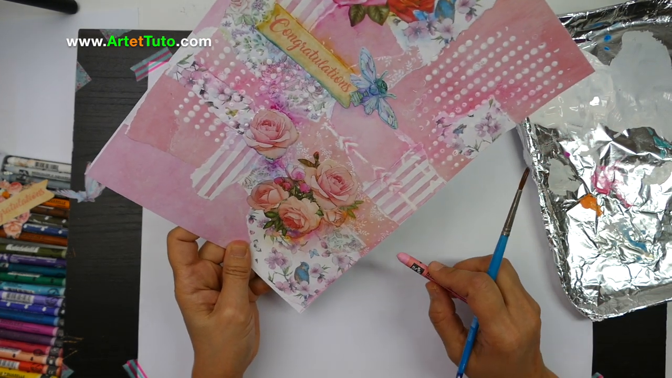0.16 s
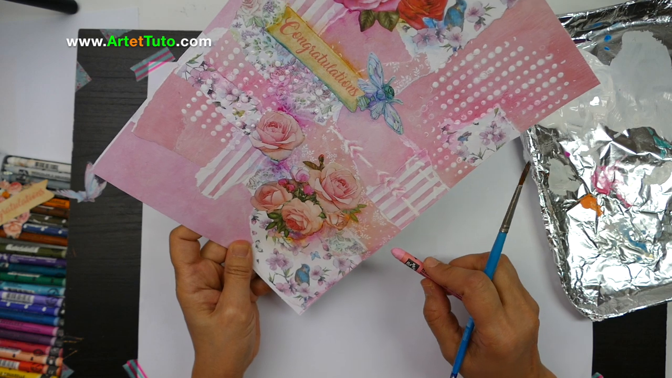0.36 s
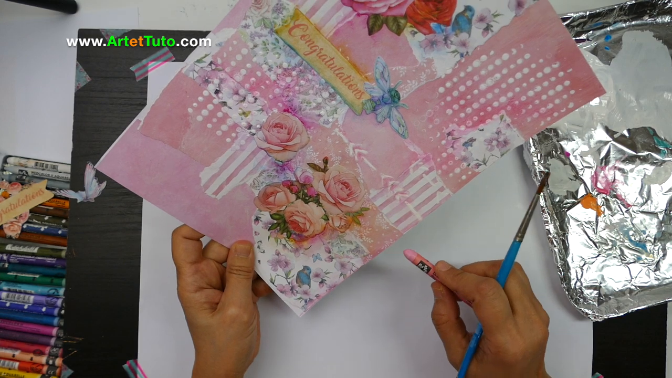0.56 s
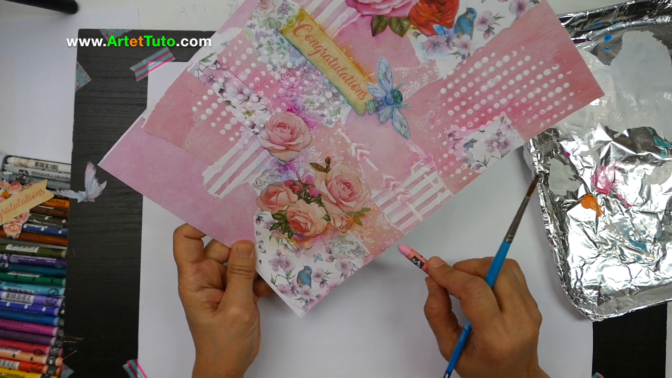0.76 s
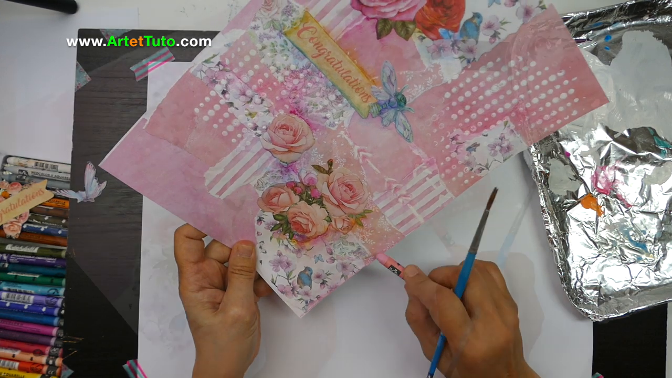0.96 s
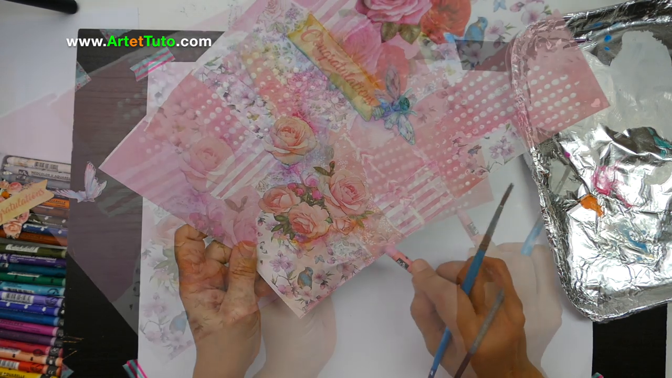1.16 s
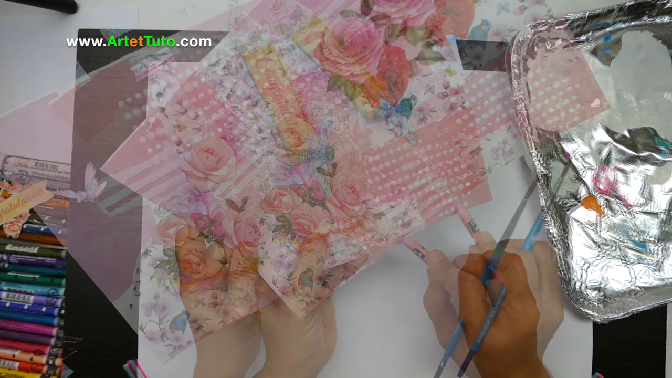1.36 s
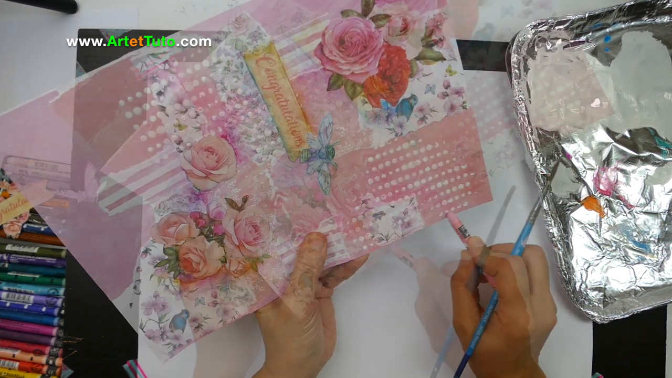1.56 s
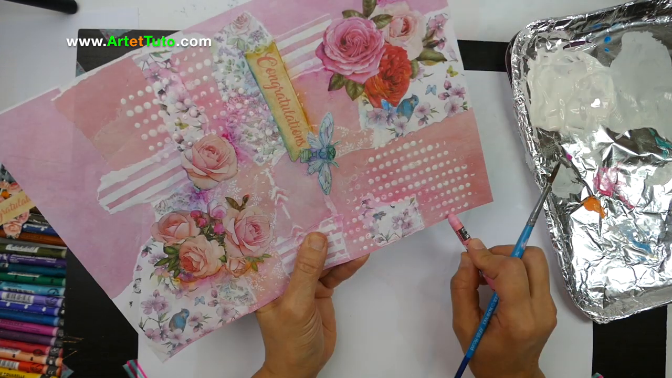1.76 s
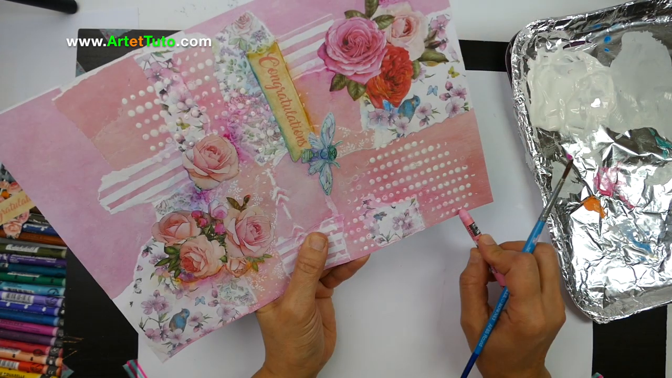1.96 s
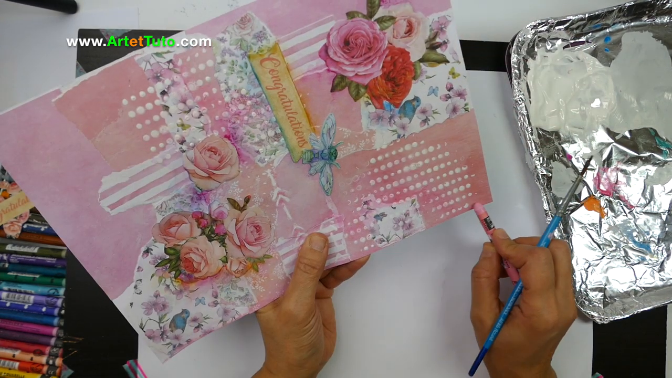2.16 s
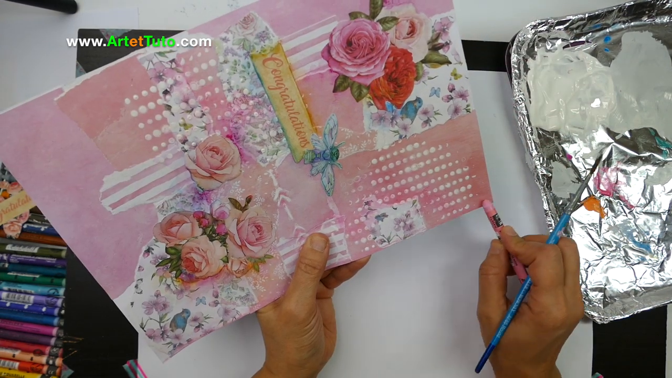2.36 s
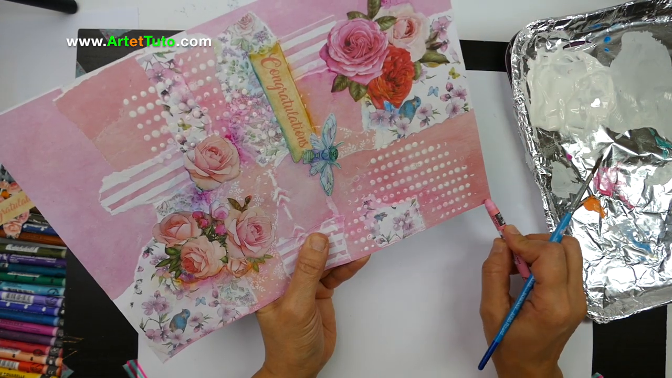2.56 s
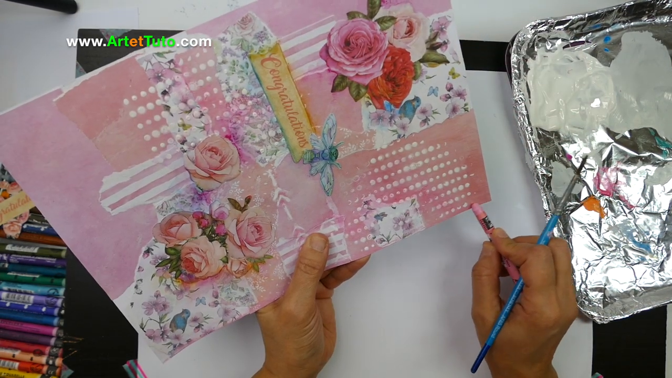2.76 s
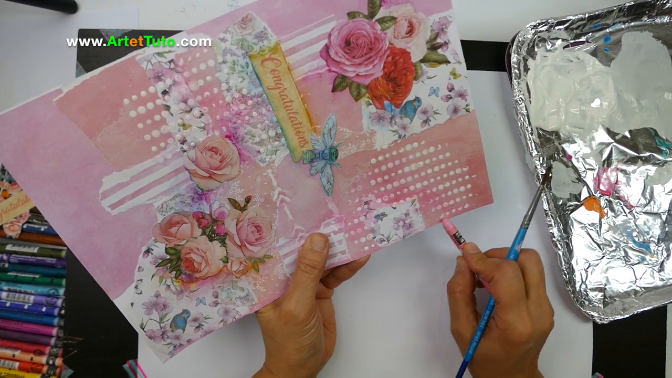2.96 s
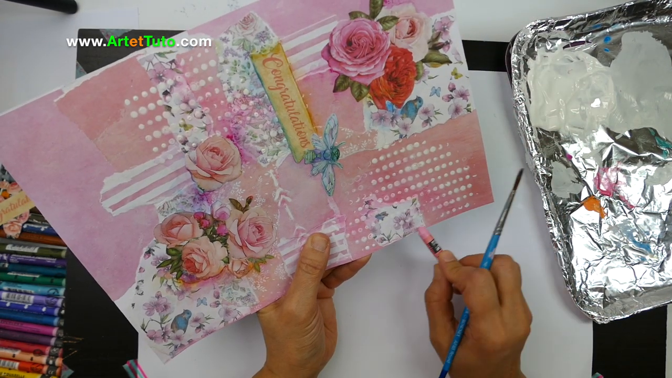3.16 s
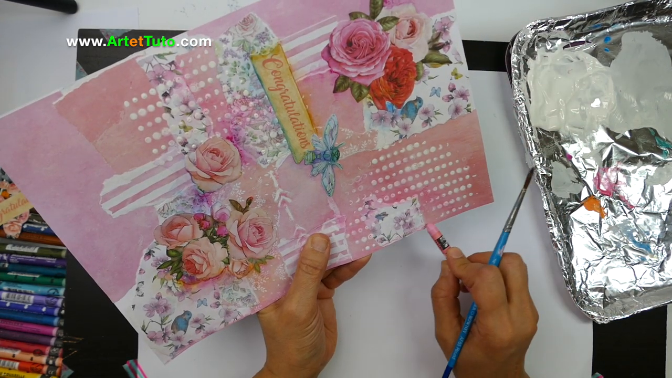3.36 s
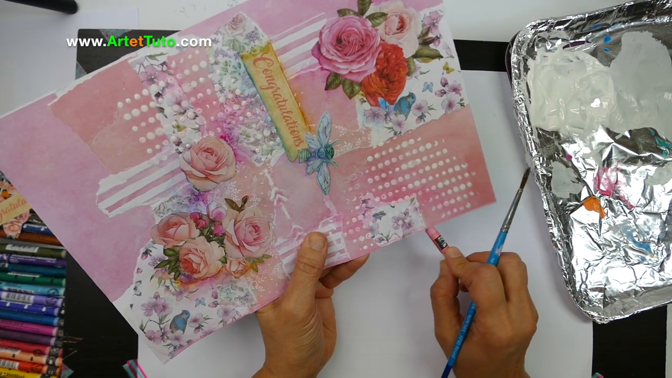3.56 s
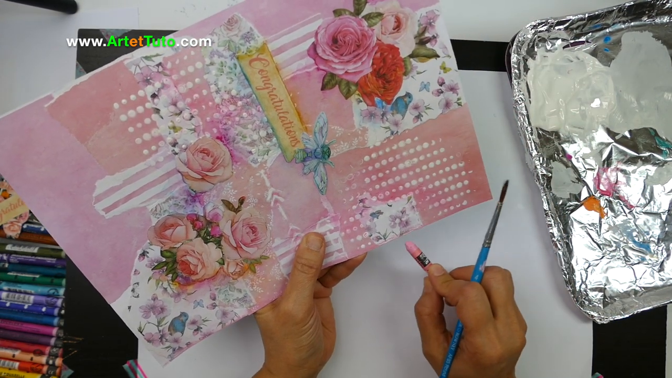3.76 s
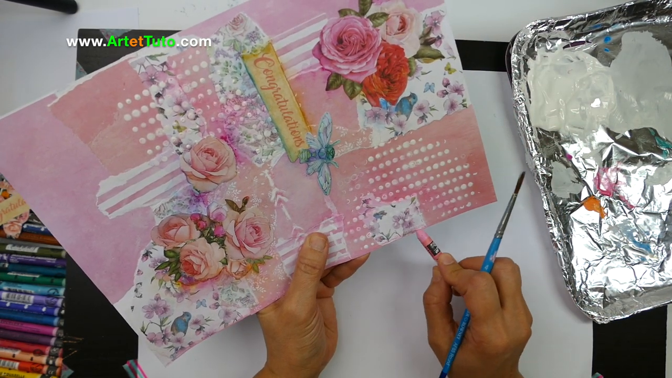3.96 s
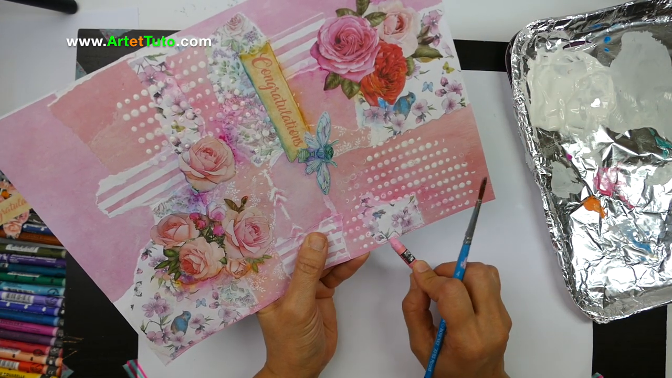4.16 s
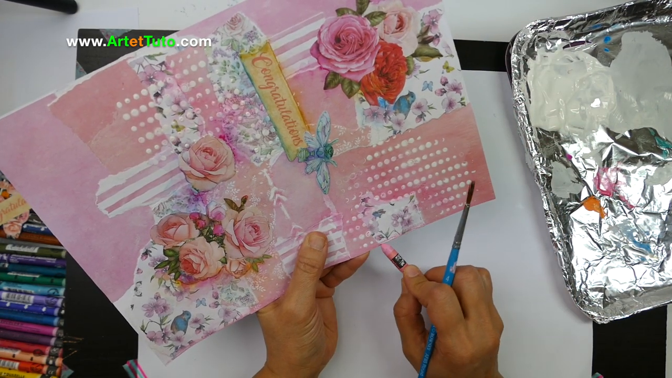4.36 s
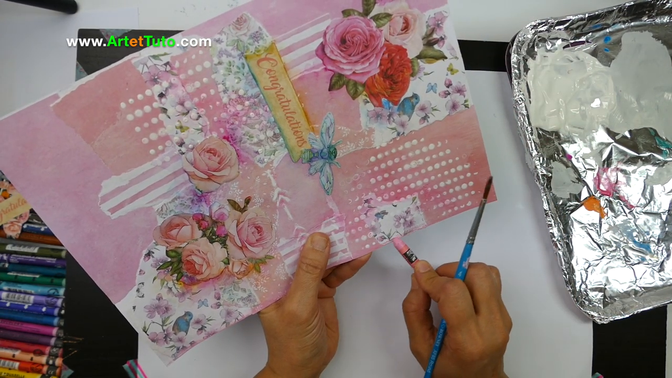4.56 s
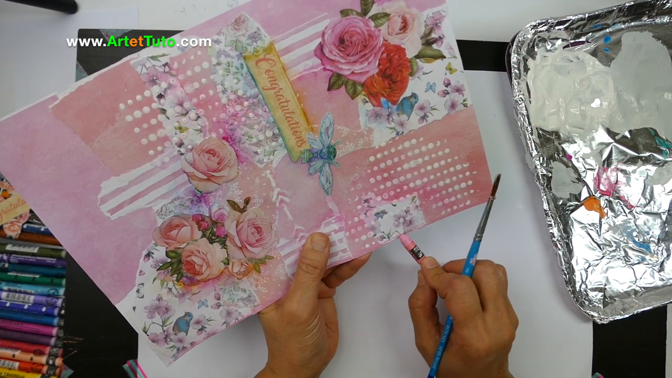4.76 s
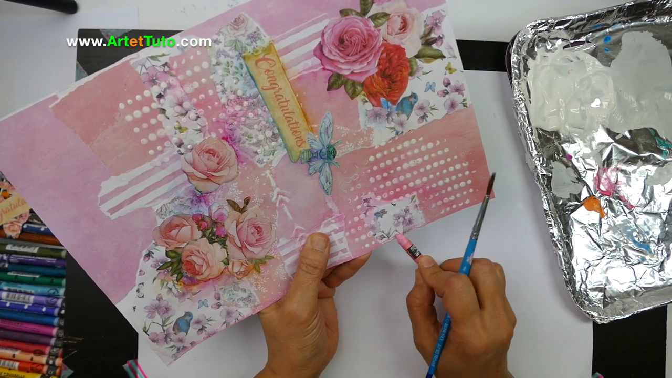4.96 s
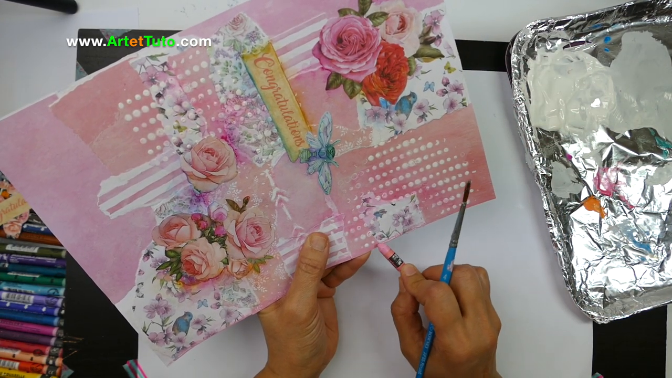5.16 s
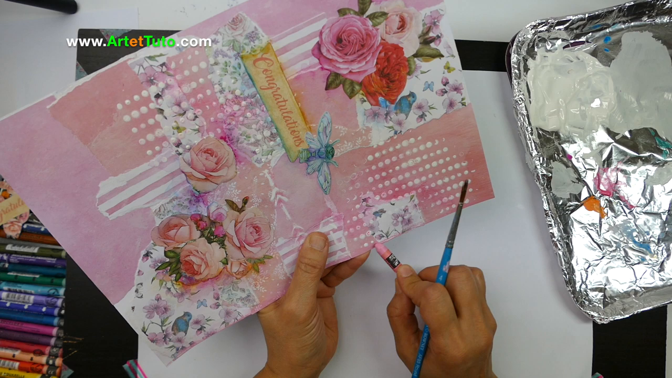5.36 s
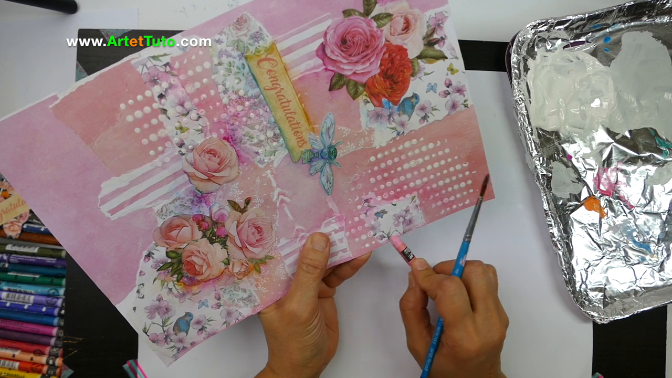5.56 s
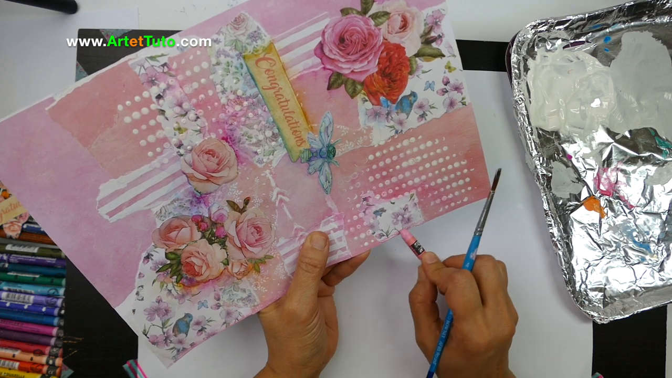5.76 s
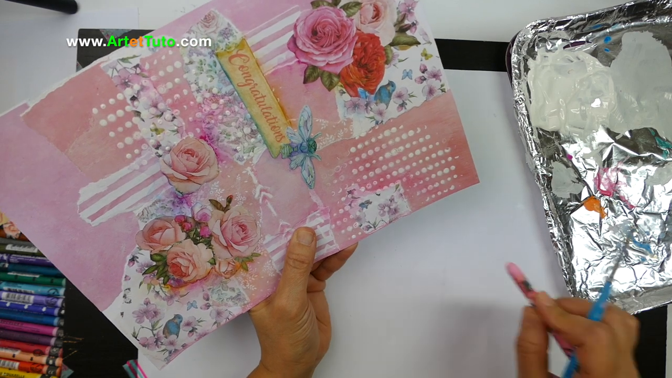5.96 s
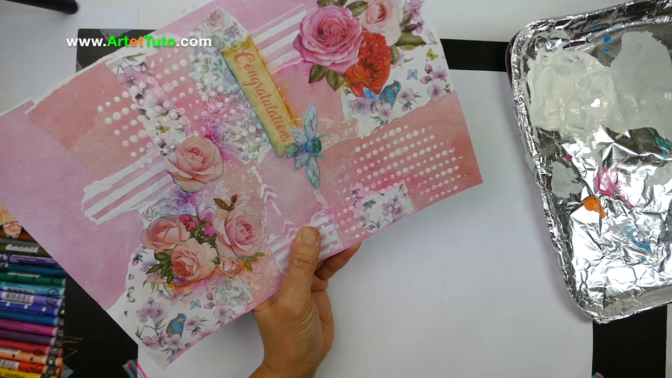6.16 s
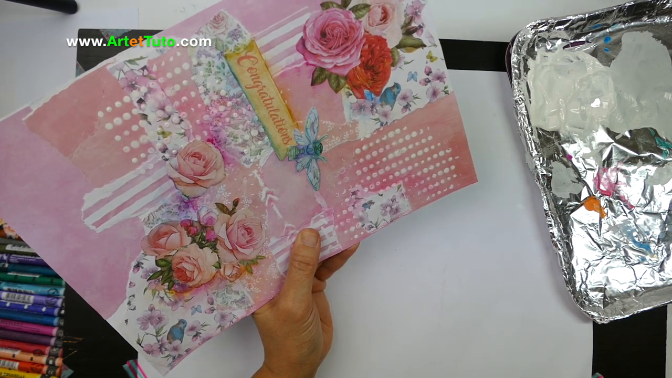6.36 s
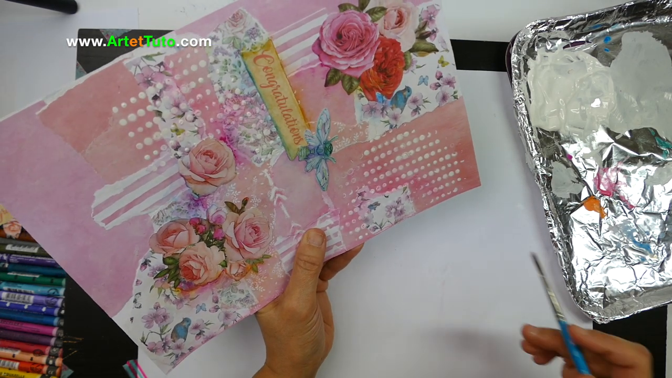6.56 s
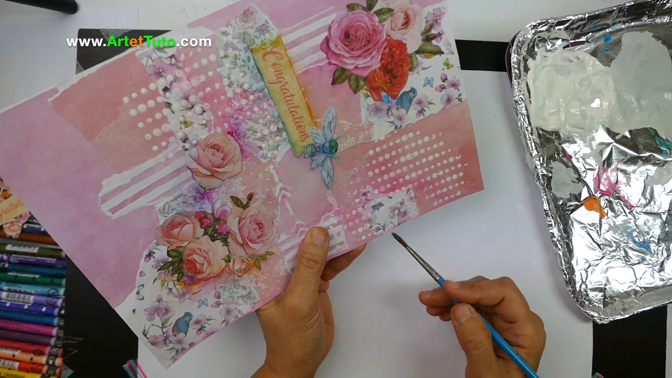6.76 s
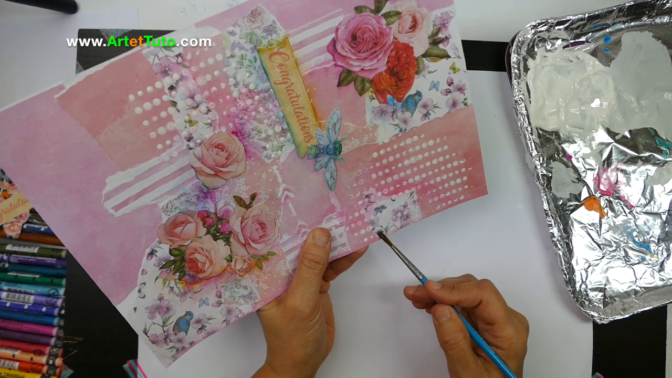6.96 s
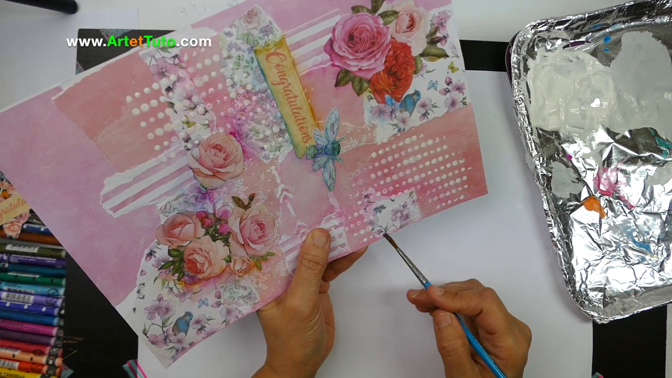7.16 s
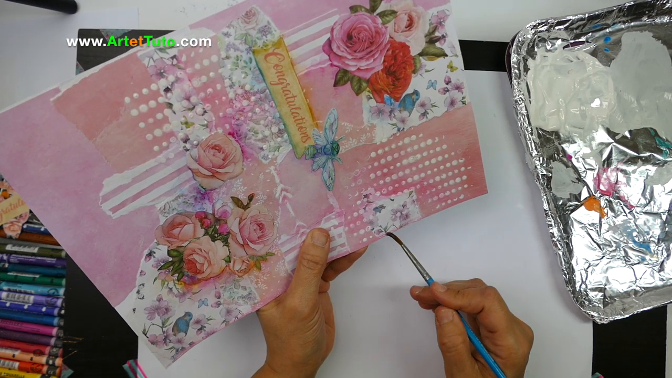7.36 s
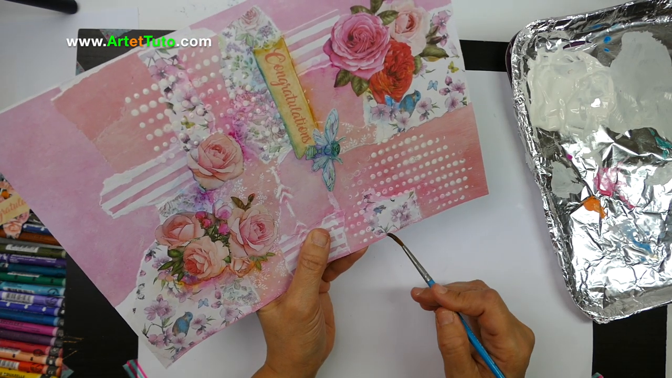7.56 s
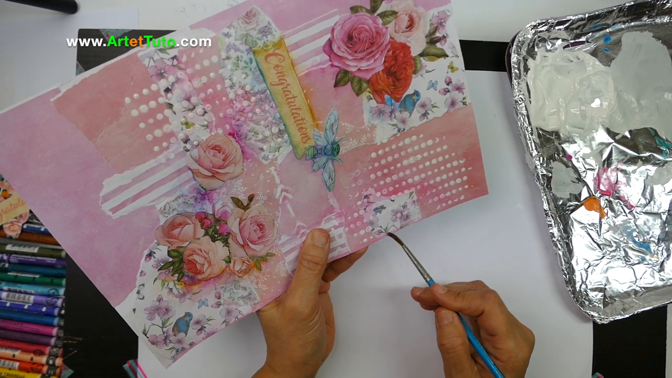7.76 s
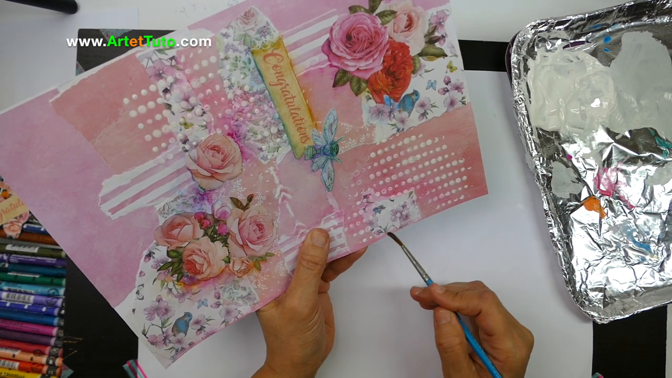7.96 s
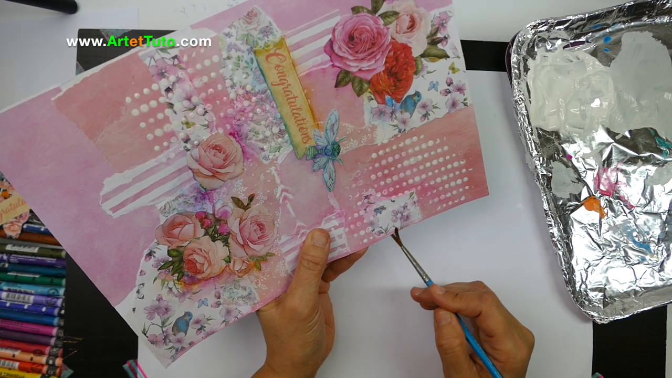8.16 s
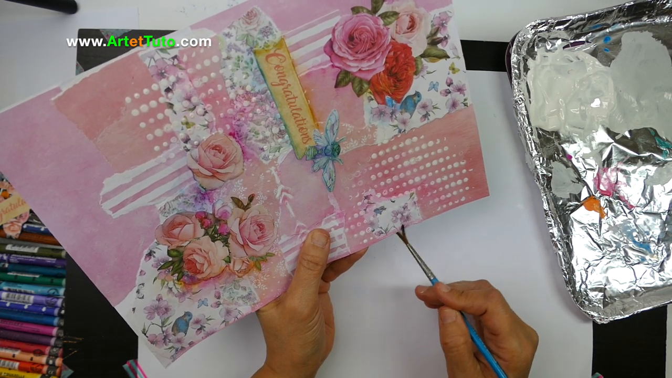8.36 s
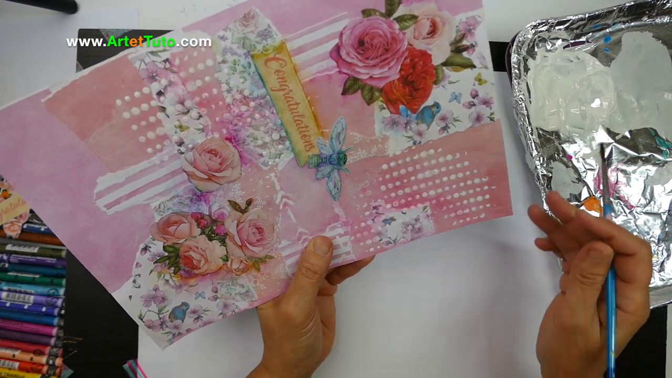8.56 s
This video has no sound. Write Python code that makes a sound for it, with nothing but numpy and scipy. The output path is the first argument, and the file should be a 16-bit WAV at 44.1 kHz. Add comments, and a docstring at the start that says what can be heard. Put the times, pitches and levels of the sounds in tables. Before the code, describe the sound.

Quick dry rubbing and small papery knocks on a stiff card, one sharp clatter on a desk, then very soft bristle strokes in a quiet room.

```python
"""Rubbing and brushing a card's edge

A pastel stick is rubbed to and fro, about eight strokes a second, along the edge of a hand-held paper card,
now and then knocking against it: random slips and single blows excite the card's modes and crumble pigment.
The stick is dropped on the desk and bounces with a clatter of decaying modes and noise; then a paintbrush
whisks softly over the same edge, as shaped random flicks. Small slides, clicks and bumps lie between.
The small, quiet room adds dense reflections, the whirr of a fan and a steady hiss."""
import sys
import numpy as np
from scipy import signal
from scipy.fft import rfft, irfft, next_fast_len
from scipy.io import wavfile

SR = 44100
rng = np.random.default_rng(int(sys.argv[2]) if len(sys.argv) > 2 else 0)


def file_out(sig):
    """Save sig as 16-bit WAV at sys.argv[1]."""
    # one column per channel
    cols = np.atleast_2d(sig).T
    # limit, then scale
    lim = np.clip(cols, -1, 1)
    pcm = np.round(lim * 32767).astype(np.int16)
    wavfile.write(sys.argv[1], SR, pcm)


N = 379701
T = np.arange(N) / SR   # time [s]

# the card's low bending modes: (frequency [Hz], width [Hz], level [dB])
BENDING_MODES = [(127, 53, -16.5), (190.6, 42, -2.5), (251, 51, -0.5), (326, 26, 1.5), (475, 112, -0.5)]
# the card's higher ringing modes: (frequency [Hz], width [Hz], level [dB])
RINGING_MODES = [(573, 40, -15), (694, 51, 3.5), (806, 84, 1.5), (893, 93, -1), (1042, 83, -1.5),
                 (1193, 106, -0.5), (1456, 98, -1), (1650, 153, -1), (1840, 790, -9.5)]
# pigment crumbling on the paper's tooth: (frequency [Hz], relative level per Hz [dB])
PIGMENT_SPECTRUM = [(1500, -17.5), (2300, -3.5), (3150, 4.5), (3650, -3), (4250, -1), (4700, -3.5),
                    (5250, -1), (6500, -7.5), (8400, -2.5), (10200, -9.5), (13500, -7.5), (16000, -14)]


def from_db(db):
    """A level in decibels is a logarithmic amplitude ratio."""
    return 10 ** (np.asarray(db) / 20)


def rms_one(x):
    """Root-mean-square normalisation gives unit mean power."""
    return x / np.sqrt(np.mean(x ** 2) + 1e-20)


def peak_one(x):
    """Peak normalisation gives a largest excursion of one."""
    return x / np.max(np.abs(x))


def at_hz(points, hz):
    """Linear interpolation of a table on a log-frequency axis."""
    table_hz, values = np.transpose(points)
    return np.interp(np.log(np.maximum(hz, 1)), np.log(table_hz), values)


def coloured(x, spectrum):
    """Spectral shaping: each frequency component is scaled by the table; the result has rms 1."""
    size = next_fast_len(len(x))
    gain = from_db(at_hz(spectrum, np.fft.rfftfreq(size, 1 / SR)))
    return rms_one(irfft(rfft(x, size) * gain, size)[:len(x)])


def cut(x, hz, kind="low", order=2):
    """Butterworth filtering: a maximally flat passband with a smooth roll-off."""
    sos = signal.butter(order, np.minimum(hz, SR / 2 - 1), kind, fs=SR, output="sos")
    return signal.sosfilt(sos, x)


def resonate(x, modes):
    """Modal superposition: parallel two-pole resonances of alternating sign."""
    out = 0
    for k, (hz, width, db) in enumerate(modes):
        r = np.exp(-np.pi * width / SR)   # a wider resonance decays faster
        poles = [1, -2 * r * np.cos(2 * np.pi * hz / SR), r * r]
        mode = signal.lfilter([1, 0, -1], poles, x + 1e-18)
        out = out + (-1) ** k * from_db(db) * (1 - r * r) / 2 * mode
    return out


def favour(hz, centre_hz, db_per_octave=8.5):
    """Selective excitation: modes far from the favoured pitch are driven less."""
    return from_db(-db_per_octave * np.abs(np.log2(hz / centre_hz)))


def add(track, s, sound):
    """Linear superposition: mix a short sound in at time s."""
    at = int(round(s * SR))
    track[at:at + len(sound)] += sound[:N - at]


def burst(t, rise_s, t60):
    """Contact transient: a brief build-up, then exponential decay by 60 dB in t60 seconds."""
    return (1 - np.exp(-(t / rise_s) ** 2)) * from_db(-60 * t / t60)


def swell(start, top, end, sharpness):
    """Friction level follows speed: near nil at the turning points, levelling off at top; arch of rms 1."""
    speed = np.sin(np.linspace(0, np.pi, 200)[:-1])
    arch = np.tanh(speed ** sharpness)
    phase = np.interp(np.arange(start, end, 1 / SR), [start, top, end], [0, .5, 1])
    return np.interp(phase, np.linspace(0, 1, len(arch)), rms_one(arch))


def strokes(start, end, number, return_db, pressure, push_longer=0.028):
    """Periodic reciprocation: push and return alternate; yields (start [s], end [s], level [dB])."""
    k = np.arange(number + 1)
    # the push takes this share more than its even share of time, the return less
    turns = start + (end - start) * (k + push_longer * (k % 2)) / number
    middles = (turns[:-1] + turns[1:]) / 2
    db = np.interp(middles, *np.transpose(pressure)) - return_db * (k[:-1] % 2)
    return zip(turns, turns[1:], db)


def grains(per_s, spread_db):
    """Stochastic impulses: tiny slips at random moments, of very uneven size and random sign."""
    sizes = from_db(spread_db * np.minimum(rng.exponential(1, N), 5))
    return (rng.random(N) < per_s / SR) * sizes * rng.choice([-1, 1], N)


def judder(rate_hz, depth_db):
    """Random amplitude modulation: the grip of a rubbing contact wavers."""
    wavering = rms_one(cut(rng.standard_normal(N), rate_hz))
    return rms_one(from_db(depth_db * wavering))


def drift(rate_hz):
    """Slow random modulation: straight lines join rate_hz random values a second, spread near 1."""
    knots = rng.standard_normal(int(N / SR * rate_hz) + 2)
    return np.interp(T * rate_hz, np.arange(len(knots)), knots)


def fan_whirr():
    """Resonant filtering: the fan's housing colours broadband noise."""
    # resonances of the housing: (frequency [Hz], width [Hz], level [dB])
    housing = [(604, 29, 2.5), (687, 17, 0)]
    # the whirr's course: (time [s], level [dB])
    course = [(0, -58), (1.3, -61), (6.1, -60), (6.6, -65.5), (8.6, -59)]
    whirr = rms_one(cut(resonate(rng.standard_normal(N), housing), [480, 820], "band"))
    return from_db(np.interp(T, *np.transpose(course))) * whirr


def steady_hiss(level_db=-57.5):
    """Stationary noise: fan and microphone hiss of fixed spectrum."""
    # (frequency [Hz], relative level per Hz [dB])
    hiss_spectrum = [(20, -17), (55, -4.5), (140, 0.5), (250, -1.5), (480, -5), (800, -4.5), (1400, -7),
                     (2600, -11), (3600, -17), (6000, -18), (9500, -18), (14500, -16), (16000, -17.5)]
    return from_db(level_db) * coloured(rng.standard_normal(N), hiss_spectrum)


def drones(width_hz=16, sharpness=0.76):
    """Narrow-band noise: random quadrature modulation makes a wavering tone, over a deep noise rumble."""
    # (start [s], end [s], frequency [Hz], drone level [dB], rumble level [dB])
    drone_spells = [(3.25, 4.4, 76.4, -69, -74), (6.802, 8.0, 113, -70.5, -90),
                    (8.1, 8.9, 99.6, -71.5, -72)]
    out = np.zeros(N)
    rumble = rms_one(cut(rng.standard_normal(N), [38, 85], "band"))
    for start, end, hz, drone_db, rumble_db in drone_spells:
        level, phase = np.zeros(N), 2 * np.pi * hz * T
        add(level, start, swell(start, (start + end) / 2, end, sharpness))
        drone = rms_one(drift(width_hz) * np.sin(phase) + drift(width_hz) * np.cos(phase))
        out += level * (from_db(drone_db) * drone + from_db(rumble_db) * rumble)
    return out


def reflections(x, build_up_s=0.0061, wall_hz=7000):
    """Diffuse reverberation: dense reflections build up, then decay at a rate set by frequency."""
    # reverberation time: (frequency [Hz], t60 [s])
    decay_times = [(150, 0.17), (500, 0.24), (1500, 0.17), (4000, 0.33), (14000, 0.296)]
    t, tail, edges = T[:SR // 2], 0, np.geomspace(100, 18000, 9)
    for low, high in zip(edges, edges[1:]):
        band = cut(rng.standard_normal(len(t)), [low, high], "band")
        tail = tail + band * from_db(-60 * t / at_hz(decay_times, np.sqrt(low * high)))
    tail = tail * (1 - np.exp(-(t / build_up_s) ** 2))
    tail = tail / np.sqrt(np.sum(tail ** 2))   # unit energy
    return signal.fftconvolve(x, cut(tail, wall_hz, order=1))[:N]


def bumps(rise_s=0.00422):
    """Single-mode excitation: a padded touch wakes only one low mode of the desk."""
    # soft, hollow bumps: (time [s], peak level [dB], frequency [Hz], t60 [s])
    soft_touches = [(6.172, -38, 308, 0.013), (6.839, -40.5, 413, 0.087)]
    out, t = np.zeros(N), T[:SR // 4]
    for s, db, hz, t60 in soft_touches:
        bump = np.sin(2 * np.pi * hz * t) * burst(t, rise_s, t60)
        add(out, s, from_db(db) * peak_one(bump))
    return out


def sliding(sharpness=1.4, attack_share=0.16):
    """Sliding friction: skin, stick and bristles on paper hiss softly, starting quickly and fading."""
    # brief slides: (start [s], length [s], level before the cut-off [dB], cut-off [Hz])
    brief_slides = [(.28, 0.22, -59, 3450), (0.467, 0.37, -65.5, 3000), (0.714, 0.35, -62.5, 3040),
                    (3.765, 0.044, -43.5, 3000), (5.591, .045, -58, 8900), (5.81, 0.13, -58, 2500),
                    (5.901, 0.15, -57.5, 12000), (6.164, 0.066, -59, 4000), (6.686, 0.11, -55, 8080)]
    # (frequency [Hz], relative level per Hz [dB])
    slide_spectrum = [(300, -13), (900, -4), (1450, 2), (2100, -4), (2800, -5.5), (4200, -8.5), (6000, -13),
                      (8200, -8.5), (11000, -14), (16000, -25)]
    out = np.zeros(N)
    hiss = coloured(grains(per_s=6900, spread_db=3.5), slide_spectrum)
    for start, length, db, top_hz in brief_slides:
        speed = swell(start, start + attack_share * length, start + length, sharpness)
        friction = speed * hiss[int(start * SR):][:len(speed)]
        add(out, start, from_db(db) * cut(friction, top_hz))
    return out


def clicks(low_hz=1300, crack_t60=0.0041, rattle=0.1):
    """Impact noise: a bright, brief crack with a weaker, longer rattle."""
    # clicks of the stick and brush handle: (time [s], peak level [dB], rattle t60 [s], cut-off [Hz])
    hard_touches = [(0.306, -39.5, 0.055, 2000), (0.351, -40, 0.033, 2380), (5.5948, -21.5, 0.066, 5030),
                    (6.274, -23, 0.022, 7000), (6.283, -21.5, 0.16, 9900), (6.331, -28.5, 0.091, 15000),
                    (6.369, -25.5, 0.017, 10800), (6.413, -30, 0.079, 7070), (6.806, -45, 0.02, 3070),
                    (8.16, -51, 0.033, 10000)]
    out, t = np.zeros(N), T[:SR // 4]
    for s, db, t60, top_hz in hard_touches:
        decay = burst(t, rise_s=0.0009, t60=crack_t60) + rattle * burst(t, rise_s=0.0007, t60=t60)
        click = cut(rng.standard_normal(len(t)) * decay, low_hz, "high")
        add(out, s, from_db(db) * peak_one(cut(click, top_hz)))
    return out


def brushing(grip_db=1.0):
    """Random impulse excitation: bristles flick over the card's edge, loudest in mid-stroke."""
    # the brush whisks to and fro: start [s], end [s], strokes, return stroke weaker by [dB]
    whisking = (7.093, 8.540, 13, 1.34)
    # pressure as the level of the bristles: (time [s], level [dB])
    bristle_pressure = [(7.15, -83), (7.37, -87.5), (7.48, -59), (7.6, -63), (7.93, -58.5), (8.04, -55),
                        (8.5, -58)]
    # (frequency [Hz], relative level per Hz [dB])
    bristle_spectrum = [(600, 2), (1300, 6.5), (2500, 4), (4000, 3.5), (5300, 2.5), (6500, 0), (8200, 5),
                        (10300, -3), (13500, -3), (16000, -3)]
    level = np.zeros(N)
    for start, end, db in strokes(*whisking, bristle_pressure):
        add(level, start, from_db(db) * swell(start, (start + end) / 2, end, sharpness=2.5))
    flicks = coloured(grains(per_s=6000, spread_db=2.0), bristle_spectrum)
    return level * judder(rate_hz=120, depth_db=grip_db) * flicks


def landings(unevenness_db=2.5, thwack_db=-1.5, thwack_t60=0.0195, wood_db=-3.0, clatter_t60=0.24,
             low_share=0.17):
    """Impact excitation: each bounce thwacks, rings the desk and shakes what lies on it; soft is duller."""
    # (time [s], level [dB], contact cut-off [Hz], clatter relative level [dB], favoured pitch [Hz])
    bounces = [(6.2754, -2, 5240, -17.5, 1680), (6.3697, -3.5, 4530, -17, 960),
               (6.3739, -12.5, 1900, -15, 900), (6.3835, -14, 1600, -13, 900),
               (6.4143, -16, 1500, -29, 800), (6.433, -22.5, 1380, -19, 700), (6.461, -45, 1800, -8, 700)]
    # modes of desk and stick: (frequency [Hz], level before favouring [dB], t60 [s])
    desk_modes = [(320, -25.5, 0.039), (400.6, 5, 0.078), (522, -5.5, 0.11), (616, -3, 0.05),
                  (692, 0.5, 0.048), (838, -3, 0.026), (1005, -8, 0.0417), (1067, -20, 0.25),
                  (1505, -13, 0.045), (1600, -11.5, 0.016), (1819, -4, 0.065), (1974, -2, 0.033),
                  (2260, -17, 0.017)]
    # the desk top's many short modes: (frequency [Hz], relative level per Hz [dB])
    thwack_spectrum = [(60, -39), (120, -18), (180, -17.5), (280, -5.5), (340, 5.5), (700, 3.5), (1150, -6),
                       (1500, -6), (2020, 1.5), (2450, -7.5), (2850, -8), (3250, -20), (3900, -15.5),
                       (5000, -15.5), (8000, -33)]
    # loose things on the desk: (frequency [Hz], relative level per Hz [dB])
    clatter_spectrum = [(200, -21), (450, 5.5), (800, 3), (1200, 8.5), (1800, 6), (2600, -30),
                        (4000, -23.5), (10000, -29.5)]
    out, t = np.zeros(N), T[:SR // 3]
    shaking = coloured(grains(per_s=820, spread_db=2.0), clatter_spectrum)
    for s, db, contact_hz, clatter_db, spot_hz in bounces:
        wood = 0
        for k, (hz, mode_db, t60) in enumerate(desk_modes):
            decay = from_db(mode_db + rng.normal(0, unevenness_db) - 60 * t / t60)
            drive = (-1) ** k * favour(hz, spot_hz, db_per_octave=4.0)
            wood = wood + drive * decay * np.sin(2 * np.pi * hz * t)
        thwack = coloured(rng.standard_normal(len(t)), thwack_spectrum)
        thwack = thwack * burst(t, rise_s=0.0012, t60=thwack_t60)
        clatter = peak_one(shaking[int(s * SR):][:len(t)] * from_db(-60 * t / clatter_t60))
        blow = from_db(wood_db) * peak_one(wood) + from_db(thwack_db) * peak_one(thwack)
        bounce = cut(blow, contact_hz) + from_db(clatter_db) * clatter
        # a stiff, high-pitched spot gives less bass
        add(out, s, from_db(db) * cut(bounce, low_share * spot_hz, "high", order=3))
    return out


def knocks(ring_db=-2.0, grit_db=-8.5, grit_follows=0.35, grit_t60=0.024, thump_s=0.013,
           rebound_s=0.00318, rebound=0.3, contact_hz=2200, crumb_hz=3400):
    """Impulse response: a blow and the card's spring-back ring its modes; deeper thumps crumble more."""
    # (time [s], level [dB], thump rms re that level [dB], pitch favoured at that spot [Hz])
    edge_knocks = [(0.987, -19.5, -28, 1170), (1.306, -41, -18, 1220), (1.457, -37, -28, 875),
                   (1.646, -39, -19, 1060), (1.745, -33.5, -29, 1050), (2.69, -25.5, -35, 910),
                   (3.125, -32, -22, 1090), (3.2, -19.5, -24.5, 689), (3.327, -17, -22, 824),
                   (3.42, -26, -18, 1040), (3.537, -26.5, -13, 1490), (3.558, -16, -18.5, 720),
                   (3.602, -22, -9, 840), (3.648, -19.5, -20, 750), (3.677, -24, -17, 1540),
                   (3.786, -13.5, -15.5, 759), (4.027, -26, -14, 1380), (4.246, -31, -23, 680),
                   (4.322, -33, -14, 1140), (4.766, -34.5, -16.5, 689), (5.611, -30, -17.5, 810),
                   (5.701, -36.5, -21, 711)]
    out, t = np.zeros(N), T[:SR // 8]
    for s, db, thump_db, spot_hz in edge_knocks:
        blow = signal.unit_impulse(len(t))
        blow[int(rebound_s * SR * rng.uniform(.7, 1.3))] += rebound
        blow = cut(blow, contact_hz)
        crumbs = coloured(rng.standard_normal(len(t)), PIGMENT_SPECTRUM)
        crumbs = peak_one(cut(crumbs * burst(t, rise_s=0.00034, t60=grit_t60), crumb_hz))
        ring = 0
        for k, mode in enumerate(RINGING_MODES):
            ring = ring + (-1) ** k * resonate(blow, [mode]) * favour(mode[0], spot_hz)
        thump = resonate(blow, BENDING_MODES)
        thump = thump / np.std(thump[t < thump_s])   # rms over the first moments
        card = from_db(ring_db) * peak_one(ring) + from_db(thump_db) * thump
        add(out, s, from_db(db) * (card + from_db(grit_db + grit_follows * thump_db) * crumbs))
    return out


def rubbing(rub_sharpness=1.53, grit_sharpness=1.0, fastest=0.52, overlap_s=0.0015, wander_db=2.0,
            usual_pressure_db=-46.5, grit_follows=0.49):
    """Stick-slip friction: slips on the paper's tooth shake the card's modes and crumble pigment."""
    # even to-and-fro rubbing: (start [s], end [s], strokes, return stroke weaker by [dB],
    # flexing relative to the rub [dB], grit at usual pressure [dB])
    rub_bouts = [(1.007, 1.57, 4, 0, -13, -62.5), (1.579, 2.858, 11, 0.5, -7, -55),
                 (2.871, 3.766, 7, 4, -9.5, -56), (4.045, 5.809, 14, 0.8, -5, -57)]
    # how hard the stick is pressed, as the level of the rub: (time [s], level [dB])
    stick_pressure = [(1.08, -49.5), (1.37, -46.5), (1.5, -50), (1.72, -47.5), (2.0, -50), (2.35, -48.5),
                      (2.68, -47), (2.81, -48), (2.94, -44), (3.06, -47), (3.19, -37), (3.32, -46.5),
                      (3.57, -38.5), (3.7, -47.5), (4.62, -51), (4.78, -54.5), (5.25, -52), (5.75, -51)]
    # the spot being rubbed favours the modes near one pitch: (time [s], pitch [Hz])
    favoured_pitch = [(1.0, 1100), (1.5, 1110), (2.4, 920), (3.2, 960), (3.5, 820), (4.1, 1010),
                      (5.8, 1000)]
    flex, ring, grit = np.zeros((3, N))
    for first, last, number, return_db, flex_db, grit_db in rub_bouts:
        for start, end, db in strokes(first, last, number, return_db, stick_pressure):
            start, end = start - overlap_s, end + overlap_s
            top = start + fastest * (end - start)
            speed = swell(start, top, end, rub_sharpness)
            add(flex, start, from_db(db + flex_db) * speed)
            add(ring, start, from_db(db) * speed)
            # the hiss sets in at a lower speed than the card's own sound and depends less on pressure
            hiss_db = grit_db + grit_follows * (db - usual_pressure_db)
            add(grit, start, from_db(hiss_db) * swell(start, top, end, grit_sharpness))
    slips = grains(per_s=2000, spread_db=3.0) * judder(rate_hz=110, depth_db=2.0)
    powder = rms_one(grains(per_s=20000, spread_db=0.5)) + .5 * rms_one(slips)
    # as the tip travels it crosses nodes and bellies, so each mode waxes and wanes
    spot_hz = np.interp(T, *np.transpose(favoured_pitch))
    card = 0
    for k, mode in enumerate(RINGING_MODES):
        waxing = favour(mode[0], spot_hz) * from_db(wander_db * drift(rate_hz=14))
        card = card + (-1) ** k * resonate(slips, [mode]) * waxing
    bending = rms_one(resonate(slips, BENDING_MODES))
    return flex * bending + ring * rms_one(card) + grit * coloured(powder, PIGMENT_SPECTRUM)


def scene(wet_db=-11.5, side_hiss_db=-78.5):
    """Mid-side superposition: all sources lie in the middle; only a faint hiss differs between left and right."""
    # faint hiss that differs between left and right: (frequency [Hz], relative level per Hz [dB])
    side_spectrum = [(20, 12.5), (70, 0), (200, 8.5), (700, 4), (2000, -7.5), (6000, -17), (15000, -26)]
    desk = bumps() + sliding() + clicks() + brushing() + landings() + knocks() + rubbing()
    background = fan_whirr() + steady_hiss() + drones()
    mid = background + from_db(wet_db) * reflections(desk) + desk
    side = from_db(side_hiss_db) * coloured(rng.standard_normal(N), side_spectrum)
    return mid + side * np.array([[1], [-1]])


def record(dry, cutoff_hz=15900):
    """Band limitation: an elliptic low-pass cuts the top steeply."""
    return signal.sosfilt(signal.ellip(10, .2, 70, cutoff_hz, fs=SR, output="sos"), dry)


dry = scene()
out = record(dry)
file_out(out)
```